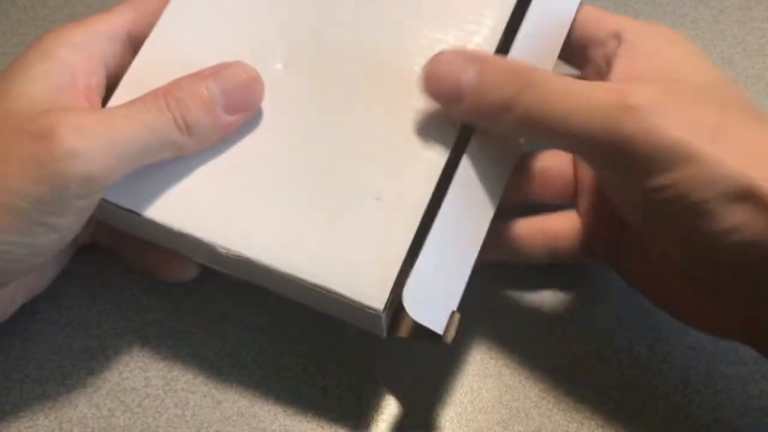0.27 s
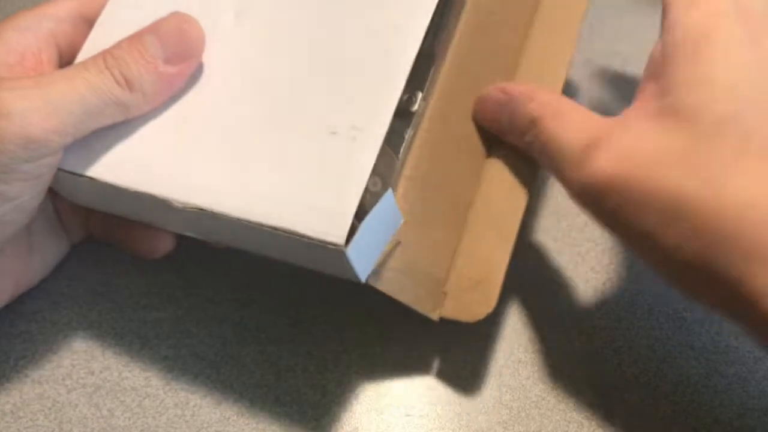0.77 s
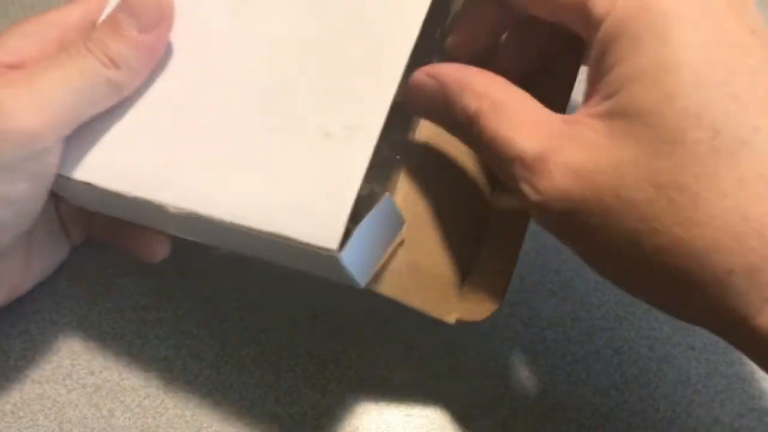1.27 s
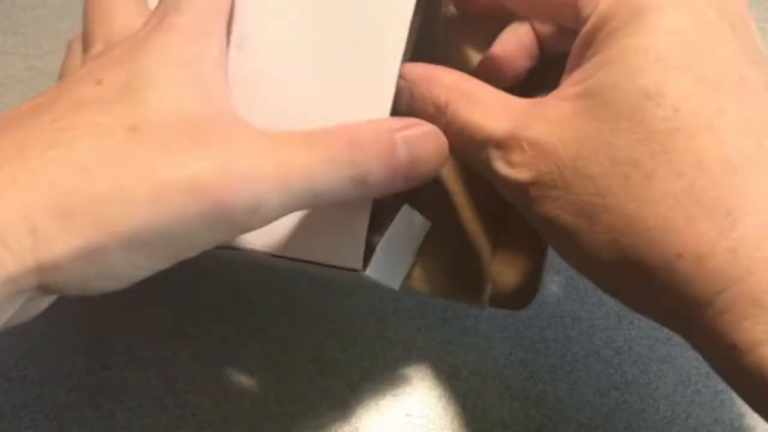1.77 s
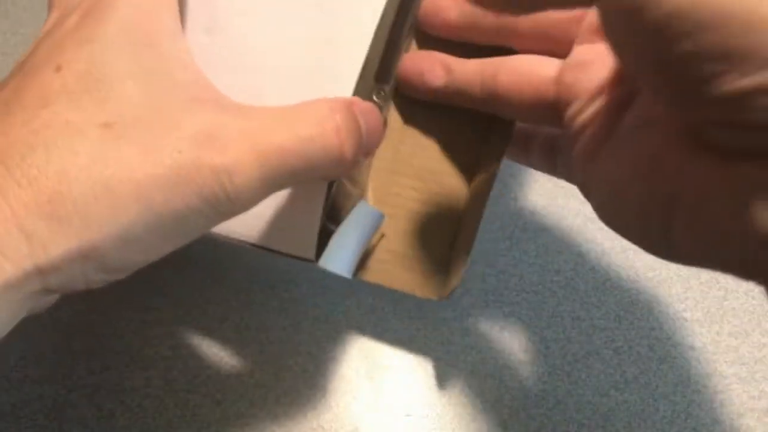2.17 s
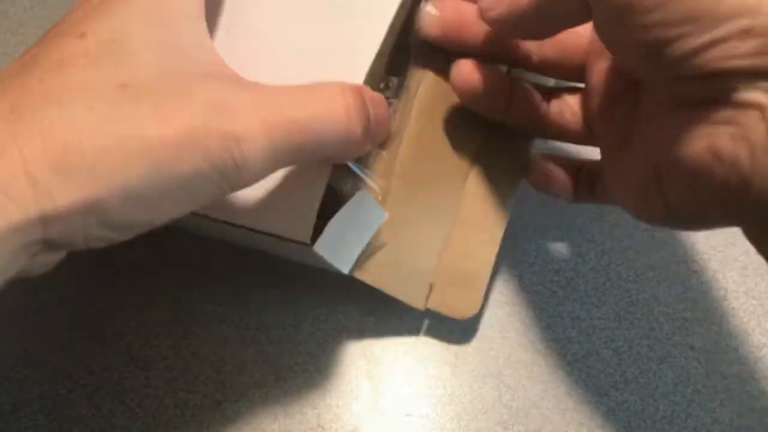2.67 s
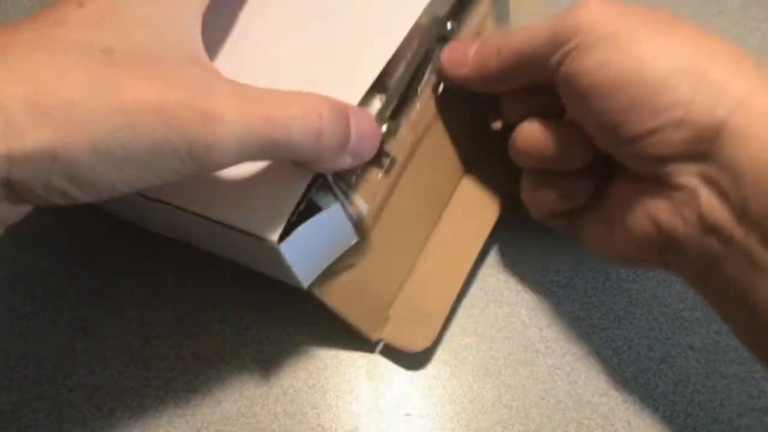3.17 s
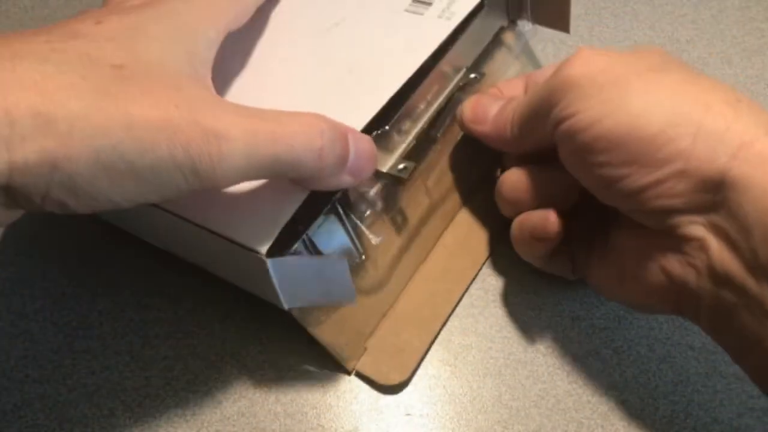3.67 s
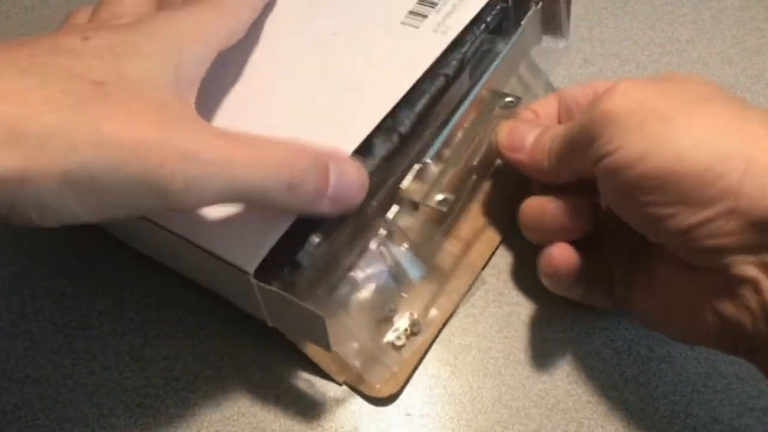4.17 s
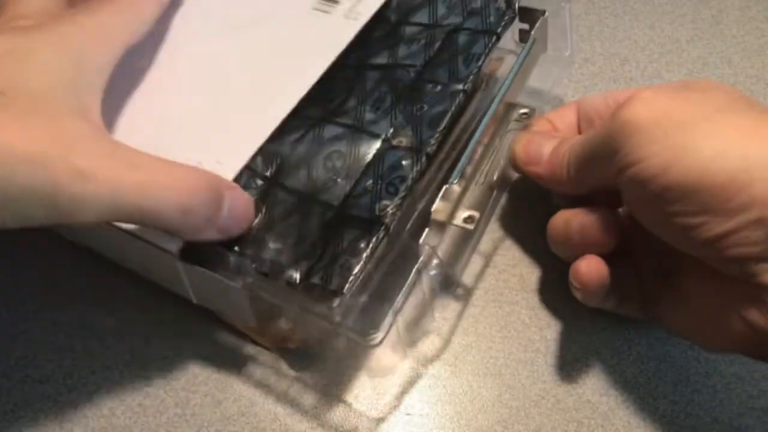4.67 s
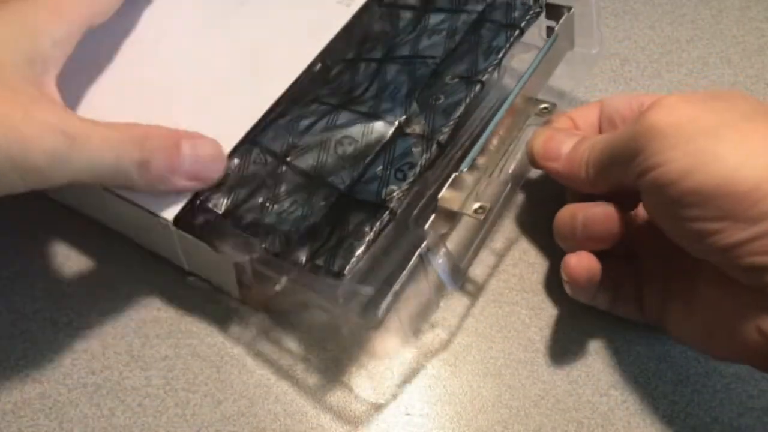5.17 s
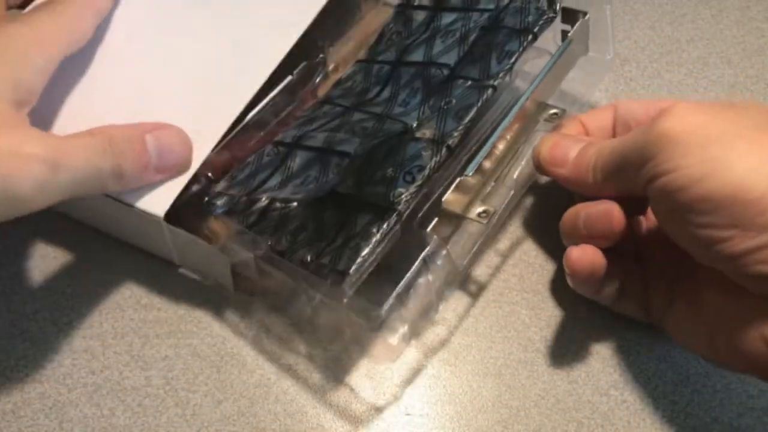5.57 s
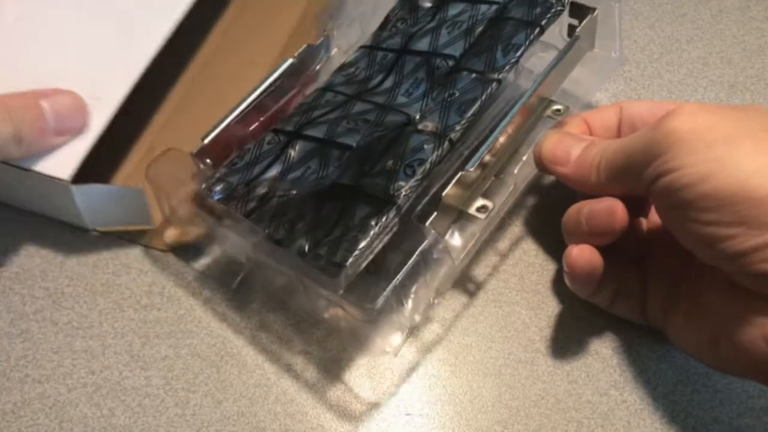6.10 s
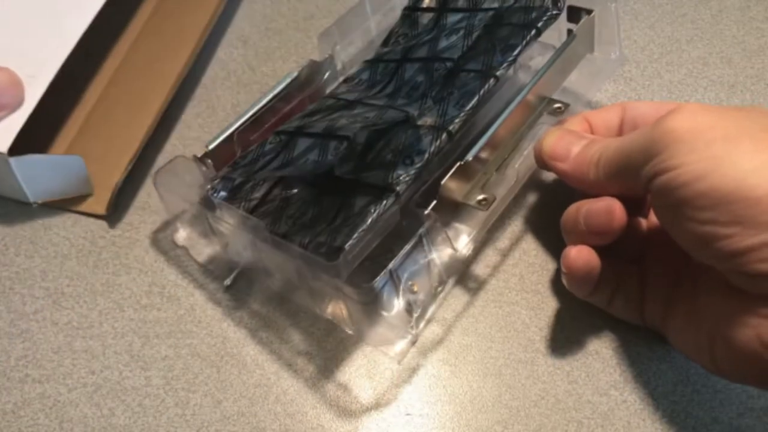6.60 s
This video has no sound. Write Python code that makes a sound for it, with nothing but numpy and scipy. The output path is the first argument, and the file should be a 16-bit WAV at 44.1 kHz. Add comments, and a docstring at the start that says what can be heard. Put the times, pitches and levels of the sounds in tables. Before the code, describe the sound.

Close, dry indoor sound with soft room air and a very faint low hum. From 0 s a light card knock and brief scuff, then sparse quiet taps and papery rubs as a flap is worked open. A cluster of firmer knocks falls at 1.05-1.25 s, with a soft thump; sparser taps and faint rubbing continue, with a crisp scuff at 2.1 s and a dull thump at 2.5 s. At 2.7 s knocks build into the loudest hollow cardboard snap at 2.76 s. Plastic ticks gather from 3.3 s, strongest near 3.56 s, then a rapid clicking chatter around 3.8 s. From 4.15 to 5.3 s the tray slides in short hollow scrapes with scattered clicks. Thinner, crisper drags and a light chatter follow to 6.3 s. At about 6.5 s the tray lands with a bright, hard clack and soft thump, quickly fading.

```python
"""A small cardboard box over a desk: hands open its flap and draw out a thin plastic tray.
Knocks, thumps and rubs ring the card; the tray ticks, chatters, slides out in strokes and clacks down.
Short bursts of slips make the blows, and trains of slips over hiss make the friction;
both drive panel resonances. A small dry room adds dense echoes, soft air and faint hums."""
import sys
import numpy as np
from scipy import signal
from scipy.fft import rfft, irfft
from scipy.io import wavfile
from scipy.ndimage import uniform_filter1d

SR = 44100
rng = np.random.default_rng(int(sys.argv[2]) if len(sys.argv) > 2 else 0)


def dump_mix(stems):
    """Bounce the given channels to the path in sys.argv[1] as a 16-bit WAV at rate SR."""
    frames = np.atleast_2d(stems).T  # one column per channel
    limited = np.clip(frames, -1, 1)  # hard clip at full scale
    pcm = np.round(limited * 32767).astype(np.int16)
    wavfile.write(sys.argv[1], SR, pcm)


N = 301644
TIME = np.arange(N) / SR
BASS_EDGE, TREBLE_EDGE, CUTOFF = 900, 4000, 16100  # Hz
# a stroke swells by this much over its rise, and loses as much again in each fall time
STROKE_DEPTH_DB = 17.5

# Event levels in all the tables stand before the trims set where they are played.
# colour of sliding contact: (pitch_hz, level_db)
SLIDE_CONTACT = [(50, -23), (130, -5.5), (250, -2.5), (500, 3), (1000, 0), (3000, -3.5), (6000, -2),
                 (10000, -8), (13000, -14), (16000, -26)]


def amp(db):
    """Decibels to gain."""
    return 10 ** (np.asarray(db) / 20)


def unit(x):
    """Scales to an rms of 1."""
    return x / np.sqrt(np.mean(x ** 2) + 1e-20)


def read(points, hz):
    """Reads a table on a log-frequency axis."""
    f, value = np.transpose(points)
    return np.interp(np.log(hz + 1), np.log(f + 1), value)


def add(mix, s, sound):
    """Mixes a sound in at a time in seconds."""
    part = mix[max(round(s * SR), 0):][:len(sound)]
    part += sound[:len(part)]


def wander(hz):
    """Slow random drift of rms 1, fading out above a rate."""
    spectrum = rfft(rng.standard_normal(N))
    return unit(irfft(spectrum / (1 + (np.fft.rfftfreq(N, 1 / SR) / hz) ** 4), N))


def ring(x, hz, width):
    """One resonance of gain 1, its width in Hz."""
    return signal.lfilter(*signal.iirpeak(hz, hz / width, SR), x)


def cardboard():
    """The box: fingers and flaps knock and rub the card, with low thumps beneath."""
    # fingers and flaps knock the card:
    # (start_s, middle_db, bass_db re middle, treble_db re middle, struck_spot_hz)
    knock_rows = [(0.027, -24, -4.5, -11, 604), (0.1017, -38.5, -11, -15, 810), (0.2705, -39, -2, -9, 675),
                  (0.392, -46, -5, -7, 820), (0.5285, -32, -2, -14, 620), (0.5327, -32, -5, -13, 810),
                  (0.8399, -37, -9, -3.5, 880), (1.0481, -23.5, -12, -13, 2040), (1.055, -29, -8, -14, 950),
                  (1.064, -27, -8, -15, 520), (1.1275, -28.5, -32, -23, 1450),
                  (1.1889, -27, -8.5, -13, 980), (1.2349, -28.5, -6.5, -8, 460),
                  (1.2427, -30.5, -1, -11, 760), (1.3548, -32, -8.5, -33, 990), (1.6752, -35, 2, -33, 840),
                  (1.8569, -34, -14, -31, 1340), (2.0389, -36, -0.5, -1, 870),
                  (2.1539, -27.5, -18, 4, 1640), (2.261, -40, -2, -6, 657), (2.2699, -27, -5.5, -4, 530),
                  (2.4114, -41, 4.5, -6, 530), (2.4941, -24, -1, -4, 480), (2.5735, -47, 0, 6.5, 840),
                  (2.688, -30.5, -13, 3, 2210), (2.6935, -16.5, -2.5, -16, 865),
                  (2.7104, -19, -12.5, -9.5, 805), (2.7456, -26, -1.5, -6, 1600),
                  (2.7557, -8.5, -2.5, -8, 1120), (2.7574, -5, -20, -7.5, 1290),
                  (2.9681, -20, 1, -4.5, 710), (3.6605, -29.5, 1.5, -6.5, 500),
                  (3.7377, -30.5, -6.5, -15, 525), (4.3984, -34, 1, -6, 520)]
    # skin and flaps rub the card: (start_s, rise_s, hold_s, fall_s,
    # middle_db, bass_db re middle, treble_db re middle, rubbed_spot_hz)
    rub_rows = [(0.0, 0.0021, 0.02, .032, -35, -3.5, -3, 1100),
                (0.232, 0.011, 0.011, 0.019, -52, 2, -12, 900),
                (0.44, .085, .008, 0.068, -50, -1.5, -6, 830), (0.59, 0.058, .006, 0.02, -55, -1, -5, 970),
                (0.735, 0.049, .012, 0.015, -53.5, -13, 0.5, 1600),
                (0.85, 0.053, 0.032, 0.017, -49.5, -6, -3.5, 1000),
                (1.06, 0.015, 0.024, 0.11, -48.5, -3, -5.5, 720),
                (1.165, 0.02, 0.043, 0.14, -46, -4, -5.5, 780),
                (1.34, 0.056, 0.052, 0.064, -51.5, 2, -4, 900),
                (1.5, 0.036, 0.043, .1, -49.5, 0.5, -3.5, 1000),
                (1.61, 0.05, 0.036, 0.17, -58.5, 1, 3.5, 810), (1.76, 0.018, .008, .06, -53, -5, -7, 1160),
                (1.85, 0.012, 0.082, .15, -54.5, 0, -9.5, 1380),
                (1.95, 0.059, 0.047, 0.13, -53, -0.5, -2, 950),
                (2.123, 0.013, 0.033, 0.013, -38, -5, 1, 1450),
                (2.17, 0.022, .04, 0.19, -53, -0.5, -8, 900), (2.39, 0.039, 0.082, 0.06, -60.5, 2, -5, 680),
                (2.52, 0.017, 0.048, 0.088, -53.5, 6, -9, 780),
                (2.62, 0.033, 0.053, 0.074, -47.5, 0, -6, 880),
                (2.765, 0.0087, 0.034, 0.099, -39, 0, -5.5, 950),
                (2.94, 0.026, 0.018, 0.075, -47.5, 0, -3, 800),
                (3.04, 0.026, 0.12, 0.18, -60, -0.5, -0.5, 850),
                (3.23, 0.024, 0.23, 0.11, -50.5, -1, -15, 800), (5.57, 0.038, .05, .03, -51, 6.5, -16, 650)]
    # box resonances: (pitch_hz, width_hz, level_db)
    box_modes = [(302, 54, 0.5), (556, 170, -6.5), (626, 49, -1), (810, 36, 4.5), (976, 31, 4.5),
                 (1317, 35, 9.5), (1570, 145, 8), (2190, 1150, 4.5), (4000, 160, -35.5), (4430, 325, -10),
                 (5470, 150, -4), (7400, 250, -10)]
    # colour of a contact on card: (pitch_hz, level_db)
    card_contact = [(50, -26), (130, -9.5), (350, 0.5), (550, 5), (1000, 0), (3000, -2), (6000, 3.5),
                    (10000, -2.5), (13000, -9.5), (16000, -24)]
    struck = body(box_modes, card_contact, crack_db=-9.5)
    rubbed = body(box_modes, SLIDE_CONTACT, crack_db=-6.5)
    knocks = blows(
        knock_rows, struck, contact_ms=2.63, crumple=0.39, bass_drag=1.8,
        spot_db=6.5, spot_width=110, bass_db=-7.0, middle_db=-14.5, treble_db=-9)
    rubs = friction(
        rub_rows, rubbed, slips_per_s=200, spread_db=3.5, hiss=1.0, judder_db=1.6, judder_hz=44.8,
        spot_db=-6.5, spot_width=560, patchy_db=2.0, bass_db=-1.5, middle_db=-2.9, treble_db=-1.85)
    return knocks + rubs + thumps(hz=240, width_hz=640, push_s=0.0019, level_db=5.0)


def tray():
    """The thin plastic shell: it ticks and chatters past the box edge, slides out, then drags free."""
    # the tray catches, buckles and lands:
    # (start_s, middle_db, bass_db re middle, treble_db re middle, struck_spot_hz)
    tick_rows = [(2.822, -18.5, -27, -18, 970), (3.1777, -35.5, -6, -25, 870), (3.2839, -36, -9, -11, 700),
                 (3.3084, -27, -5, -11.5, 1340), (3.3124, -32, -4, -8, 1340),
                 (3.3209, -21.5, -10, -14, 1560), (3.3333, -23, -18, -4.5, 2550),
                 (3.3374, -15.5, -20, -25, 1510), (3.3444, -21.5, -17, -14, 2560),
                 (3.3584, -25.5, -8, -25, 2660), (3.4111, -22, -11, -17.5, 1500),
                 (3.4301, -27, -16, -18, 1550), (3.4555, -24.5, -14, -19.5, 2530),
                 (3.472, -38, -13, -19, 890), (3.493, -25, -19, -19, 2540), (3.5104, -20, -12, -15, 2500),
                 (3.5379, -14, -9, -16, 3230), (3.5628, -9, -20, -18.5, 2450),
                 (3.7584, -21.5, -17, -20, 2600), (3.7668, -15, -12.5, -23, 1320),
                 (3.7784, -20, -14, -15, 2520), (3.7873, -14, -13, -11, 2500),
                 (3.7934, -17.5, -7, -22, 1236), (3.8644, -19, -5, -11, 790), (3.9709, -38, 3, -13, 710),
                 (3.9858, -32.5, -21, -16, 790), (4.1614, -30, 0.5, -16, 1710),
                 (4.1684, -27.5, -3, -26, 1280), (4.4787, -22, -8, -13, 850), (4.6124, -16, -5, -19, 1320),
                 (4.6214, -16.5, -5, -22, 1340), (4.7304, -21.5, -20, -10.5, 1320),
                 (4.8888, -35, -22, -11, 2380), (5.0724, -26, -10, -34, 1540), (5.1704, -42, -5, -1, 855),
                 (5.2205, -17, -24, -24, 1540), (5.3338, -19, -12, -14, 2300),
                 (5.4645, -29.5, -19, -13, 826), (5.5789, -28.5, -14, 0.5, 2540),
                 (5.9163, -36, -7, -12, 1540), (6.1045, -29.5, -5, -4.5, 3540), (6.1164, -31, -5, -5, 700),
                 (6.1454, -21, -21, -9, 3560), (6.4214, -30.5, -18, -4.5, 3010),
                 (6.4273, -30, -25, -7, 2290), (6.4622, -44, -11, -9, 860), (6.4961, -15, -16, -12.5, 3680),
                 (6.5014, -12.5, -14, -29, 1410), (6.5241, -4.5, -18.5, -19.5, 2230),
                 (6.5354, -15.5, -12, -18, 2310)]
    # Three kinds of stroke, all as (start_s, rise_s, hold_s, fall_s,
    # middle_db, bass_db re middle, treble_db re middle, rubbed_spot_hz):
    # the rim chatters over an edge
    chatter_rows = [(3.755, 0.0099, 0.055, 0.033, -35, -0.5, -16, 2550),
                    (3.812, 0.018, 0.016, 0.021, -22.5, -14.5, -13.5, 2630),
                    (3.85, 0.0087, 0.0067, 0.024, -35.5, 5, -16, 2950),
                    (5.68, 0.057, 0.032, 0.097, -47.5, -2, -8, 2800),
                    (5.76, 0.046, 0.081, 0.12, -40.5, -5, -14, 3220),
                    (6.0, 0.036, 0.0094, 0.049, -47, -1, -4.5, 3200),
                    (6.143, 0.0041, 0.012, 0.014, -32.5, -4.5, -3, 3500),
                    (6.53, .01, 0.018, 0.15, -42.5, -7, -17.5, 2420)]
    # the tray slides inside the hollow box
    slide_rows = [(3.8, 0.033, .03, 0.029, -32.5, -7, -23, 1270),
                  (3.87, 0.0089, 0.025, 0.064, -47.5, 6.5, -13, 780),
                  (3.96, 0.019, .065, 0.13, -52.5, 2.5, -4, 875),
                  (4.15, 0.014, 0.17, 0.033, -43, -5.5, -11, 1280),
                  (4.37, 0.014, .02, 0.059, -48, 5, 2.5, 680),
                  (4.41, 0.019, 0.013, .03, -37.5, -7.5, -14, 1000),
                  (4.46, 0.019, .013, 0.024, -30, -12, -15, 1280),
                  (4.53, 0.044, 0.056, 0.059, -34, -10, -10, 1360),
                  (4.64, 0.021, 0.065, 0.044, -31.5, -10.5, -9, 1250),
                  (4.74, 0.017, 0.087, 0.1, -47.5, -5.5, -10.5, 1100),
                  (4.95, .065, 0.052, 0.028, -43.5, -6, -9.5, 1200),
                  (5.165, 0.053, 0.052, 0.094, -37, -3, -8.5, 1450)]
    # the tray drags over flap and desk
    drag_rows = [(5.45, 0.017, 0.0085, 0.038, -52.5, 4, -12, 1718),
                 (5.495, 0.029, 0.053, 0.045, -39, -5, -3, 2240),
                 (5.55, 0.027, 0.023, 0.085, -41, -6, 0, 1680),
                 (6.085, .022, 0.022, 0.019, -38.5, -3, -2.5, 1430),
                 (6.15, 0.013, 0.11, 0.097, -42, -9, -3, 1200),
                 (6.335, 0.039, .06, 0.12, -42, -9, -4.5, 2350)]
    # resonances of the tray: (pitch_hz, width_hz, level_db)
    tray_modes = [(544, 60, -2), (673, 95, -3), (840, 63, -1.5), (1133, 22, 0.5), (1360, 26, 4),
                  (1560, 118, 2.5), (1980, 270, -7.5), (2523, 430, 2.5), (3130, 120, 1), (3450, 160, 2.5),
                  (4900, 440, -2.5), (5750, 390, -2), (7140, 230, -5), (9200, 320, -12)]
    # resonances of the box with the tray pressed inside: (pitch_hz, width_hz, level_db)
    sleeve_modes = [(285, 56, -0.5), (504, 260, -3), (640, 160, -1.5), (823, 103, 0.5), (1073, 58, -1.5),
                    (1350, 33, 3.5), (1570, 370, -4.5), (2060, 100, -2.5), (2480, 490, -6),
                    (3000, 130, -23), (3370, 63, -28), (5220, 240, -22), (5900, 330, -29)]
    # resonances of the tray lying free: (pitch_hz, width_hz, level_db)
    free_modes = [(640, 120, 2), (825, 36, 6.5), (1204, 33, -2.5), (1560, 210, -4), (2350, 280, -3),
                  (3130, 180, 1), (3250, 160, -7), (4400, 300, -1), (5440, 350, -1.5), (7800, 490, -5)]
    # colour of a contact on plastic: (pitch_hz, level_db)
    plastic_contact = [(50, -18), (130, -10.5), (330, -6), (550, -1), (1000, 4), (3000, 1), (6000, 1.5),
                       (10000, 5), (13000, -5), (16000, -17)]
    shell = body(tray_modes, plastic_contact, crack_db=-15.5)
    sleeve = body(sleeve_modes, SLIDE_CONTACT, crack_db=-26.5)
    free = body(free_modes, SLIDE_CONTACT, crack_db=-7.5)
    ticks = blows(
        tick_rows, shell, contact_ms=1.78, crumple=0.23, bass_drag=4.4,
        spot_db=5.0, spot_width=165, bass_db=-9.5, middle_db=-14.5, treble_db=-7.0)
    chatters = friction(
        chatter_rows, shell, slips_per_s=900, spread_db=3.0, hiss=0.9, judder_db=1.5, judder_hz=70,
        spot_db=-7, spot_width=130, patchy_db=3.5, bass_db=-1.8, middle_db=-2.64, treble_db=-2.7)
    slides = friction(
        slide_rows, sleeve, slips_per_s=900, spread_db=3, hiss=1.0, judder_db=2.3, judder_hz=59.3,
        spot_db=-6, spot_width=320, patchy_db=2.5, bass_db=-1.3, middle_db=-0.1, treble_db=-.8)
    drags = friction(
        drag_rows, free, slips_per_s=400, spread_db=3.5, hiss=1.0, judder_db=2.0, judder_hz=59.7,
        spot_db=-5, spot_width=530, patchy_db=3.5, bass_db=0.6, middle_db=1.1, treble_db=-1.1)
    return ticks + chatters + slides + drags


def blows(rows, response, contact_ms, crumple, bass_drag, spot_db, spot_width,
          bass_db, middle_db, treble_db, size=2048):
    """A snap and a dying burst of tiny slips ring the panel, toward the microphone and into the room."""
    out = np.zeros((2, N))
    ms = 1000 * np.arange(size) / SR
    window = .01 * SR  # levels count as rms over 10 ms
    parts = registers(response)
    drags = (bass_drag, 1, 1)  # slow bass waves linger longer in the panel
    for s, db, bass, treble, spot_hz in rows:
        slips = crumple * rng.standard_normal(size)
        levels = (bass + bass_db, middle_db, treble + treble_db)
        for part, level, drag in zip(parts, levels, drags):
            force = slips * np.exp(-ms / (contact_ms * drag))
            force[0] += 1  # the snap
            spot = part + amp(spot_db) * ring(part, spot_hz, spot_width)
            direct = signal.fftconvolve(force, spot)
            # summed over all directions, the ripple of the slips evens out
            for path, sound in zip(out, (direct, spot)):
                gain = amp(db + level) * np.sqrt(window / np.sum(sound ** 2))
                add(path, s, gain * sound)
    return out


def friction(strokes, response, slips_per_s, spread_db, hiss, judder_db, judder_hz, spot_db, spot_width,
             patchy_db, bass_db, middle_db, treble_db):
    """Uneven slips over a fine hiss drive the panel; the grip judders and each stroke rubs its own spot."""
    sizes = amp(spread_db * np.minimum(rng.exponential(1, N), 3.5)) * rng.choice([-1, 1], N)
    slips = unit(sizes * (rng.random(N) < slips_per_s / SR))
    force = (slips + hiss * rng.standard_normal(N)) * amp(judder_db * wander(judder_hz))
    force = shifting(force, patchy_db)
    db, bass, treble, spot_hz = np.transpose(strokes)[4:]
    power = np.array([pressure(*stroke[:4]) for stroke in strokes]) ** 2
    # the spot's pitch leans toward whichever stroke is strongest
    spot_curve = spot_hz @ power / power.sum(0)
    force = force + amp(spot_db) * glide(force, spot_curve, spot_width)
    stroke_levels = amp([db + bass + bass_db, db + middle_db, db + treble + treble_db])
    levels = np.sqrt(stroke_levels ** 2 @ power)
    out = 0
    for level, part in zip(levels, registers(response)):
        out = out + level * unit(signal.oaconvolve(force, part)[:N])
    return out


def thumps(hz, width_hz, push_s, level_db, size=4096):
    """Soft, uneven pushes: each a short noise swell through one broad low resonance, twice over."""
    # low thumps under some of the knocks and under the tray's landing: (start_s, peak_db)
    thump_rows = [(1.045, -32.5), (2.494, -26.5), (2.694, -21.5), (2.757, -33), (2.966, -37), (3.656, -37),
                  (4.398, -39.5), (6.522, -28.5)]
    out, t = np.zeros(N), np.arange(size) / SR
    for s, db in thump_rows:
        push = rng.standard_normal(size) * t * np.exp(-t / push_s)
        sound = ring(ring(push, hz, width_hz), hz, width_hz)
        add(out, s, amp(db + level_db) * sound / abs(sound).max())
    return out


def pressure(start, rise, hold, fall):
    """Envelope of one stroke, its times in seconds: it swells, holds and dies away."""
    t = TIME - start
    before = np.maximum(1 - t / max(rise, .001), 0)
    after = np.maximum(t - rise - hold, 0) / max(fall, .001)
    return amp(-STROKE_DEPTH_DB * np.minimum(before + after, 10))


def shifting(x, depth_db, order=512):
    """Each slip lands on another spot of the panel, so the colour changes in short patches."""
    z = signal.stft(x, SR, nperseg=order)[2]
    across_pitch = uniform_filter1d(rng.standard_normal(z.shape), size=7, axis=0)
    patches = unit(uniform_filter1d(across_pitch, size=3, axis=1))
    return signal.istft(z * amp(depth_db * patches), SR, nperseg=order)[1][:N]


def glide(x, hz, width):
    """A resonance of gain 1 that follows a pitch curve: shift to zero, smooth, shift back."""
    turn = np.exp(2j * np.pi * np.cumsum(hz) / SR)
    r = np.exp(-np.pi * width / SR)
    return 2 * (turn * signal.lfilter([1 - r], [1, -r], x / turn)).real


def body(modes, contact, crack_db, size=4096):
    """Response of a panel to one click: a broad crack and its ringing modes, made causal."""
    hz = np.fft.rfftfreq(size, 1 / SR)
    ringing = sum(amp(db) ** 2 / (1 + (2 * (hz - f) / width) ** 2) for f, width, db in modes)
    power = amp(crack_db) ** 2 + ringing
    log_gain = np.log(np.sqrt(power) * amp(read(contact, hz)))
    # minimum phase: the energy comes as early as this colour allows
    circle = np.r_[log_gain, log_gain[-2:0:-1]]
    return np.fft.ifft(np.exp(np.conj(signal.hilbert(circle)))).real[:size // 2]


def registers(x, order=4):
    """Splits a sound into bass, middle and treble."""
    bands = (BASS_EDGE, "low"), ((BASS_EDGE, TREBLE_EDGE), "band"), (TREBLE_EDGE, "high")
    return [signal.sosfilt(signal.butter(order, edge, kind, fs=SR, output="sos"), x)
            for edge, kind in bands]


def room(x, onset_s, count=14):
    """Random dense echo patterns crossfade, so that no single pattern rings on in narrow lines."""
    out = np.zeros(N)
    place = TIME / TIME[-1] * (count - 1)
    for k in range(count):
        near = abs(place - k) < 1
        faded = x[near] * np.cos(np.pi / 2 * (place[near] - k))
        add(out, TIME[near][0], signal.fftconvolve(faded, reflections(onset_s)))
    return out


def reflections(onset_s, size=22050):
    """Dense echoes from the desk and near walls, each pitch dying at its own rate, the top soonest."""
    # room decay: (pitch_hz, time_to_fall_60_db_s)
    decay = [(150, 0.3), (500, 0.25), (1400, 0.29), (3700, 0.2), (8000, 0.21), (15000, 0.17)]
    t = np.arange(size) / SR
    taps = rng.standard_normal(size) * (rng.random(size) < 5000 / SR)  # about 5000 echoes a second
    hz, frame_s, z = signal.stft(taps, SR, nperseg=256)
    fade = amp(-60 * frame_s / read(decay, hz)[:, None])
    tail = signal.istft(z * fade, SR, nperseg=256)[1][:size]
    tail = tail * np.clip(t / onset_s - .5, 0, 1)
    return tail / np.linalg.norm(tail)


def background(air_db, waft_s, waft_hz, waft_width_s, waft_db):
    """Room air as coloured noise, hums as narrow noise, and one slow waft as the flap swings open."""
    # colour of the still room: (pitch_hz, relative level_db per Hz)
    air_colour = [(5, 14.5), (12, 17.5), (20, 1.5), (35, -8), (60, -9), (110, -17), (200, -25),
                  (330, -14.5), (560, -19.5), (800, -22.5), (1300, -30), (2500, -32), (4000, -38.5),
                  (6000, -37.5), (11800, -46.5), (16000, -56)]
    # steady hums: (pitch_hz, width_hz, level_db)
    hum_rows = [(54.6, 3, -64.5), (804, 13, -82), (4010, 100, -76.5)]
    colour = amp(read(air_colour, np.fft.rfftfreq(N, 1 / SR)))
    air = irfft(rfft(rng.standard_normal(N)) * colour, N)
    hums = sum(amp(db) * unit(ring(rng.standard_normal(N), hz, width)) for hz, width, db in hum_rows)
    t = TIME - waft_s
    waft = np.sin(2 * np.pi * waft_hz * t) * np.exp(-(t / waft_width_s) ** 2)
    return amp(air_db) * unit(air) + hums + amp(waft_db) * waft


def scene():
    """Box and tray, heard directly and through the room, over the background."""
    direct, all_round = cardboard() + tray()
    still = background(air_db=-44.5, waft_s=.825, waft_hz=19.7, waft_width_s=0.066, waft_db=-35.0)
    return (direct + amp(-9) * room(all_round, onset_s=0.0017) + still)[None]


def record(dry):
    """The recorder rounds off the highest peaks, then limits the band."""
    ceiling = .75  # full scale is 1
    rounded = ceiling * np.tanh(dry / ceiling)
    lowpass = signal.firwin(511, CUTOFF, window=("kaiser", 9), fs=SR)
    return signal.oaconvolve(rounded, lowpass[None], "same")


dry = scene()
out = record(dry)
dump_mix(out)
```